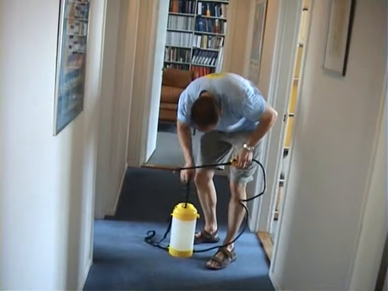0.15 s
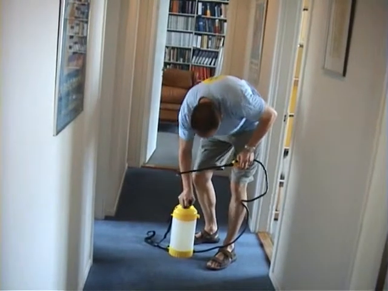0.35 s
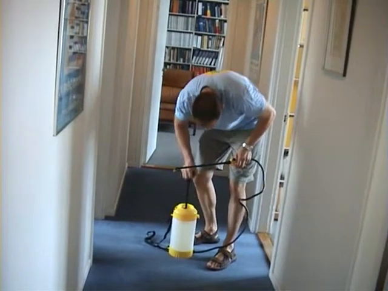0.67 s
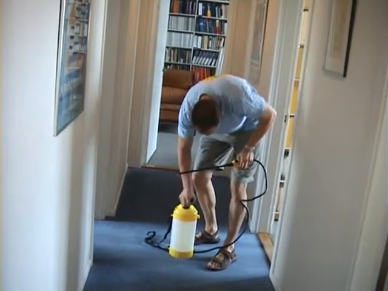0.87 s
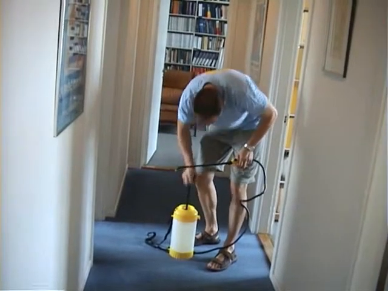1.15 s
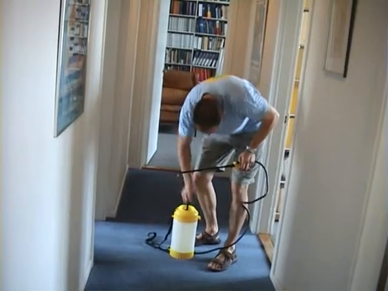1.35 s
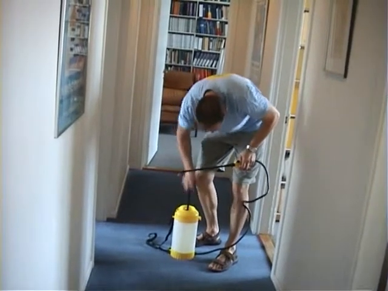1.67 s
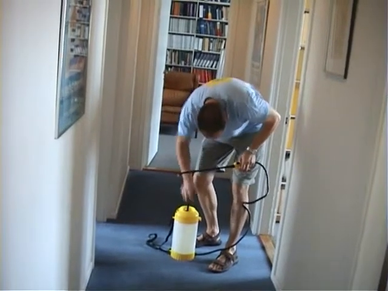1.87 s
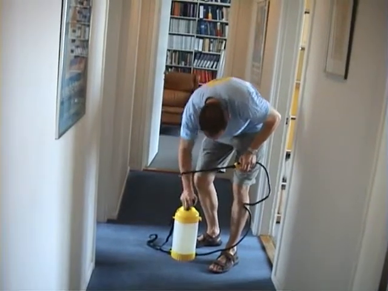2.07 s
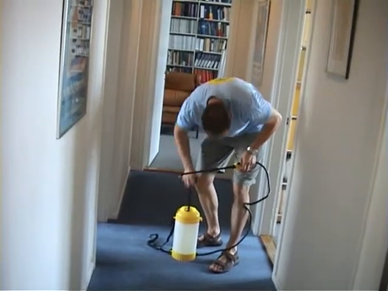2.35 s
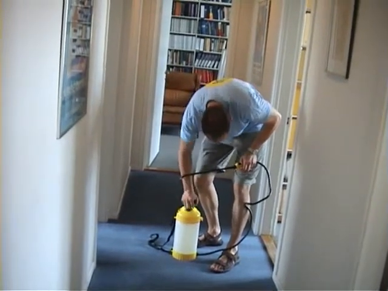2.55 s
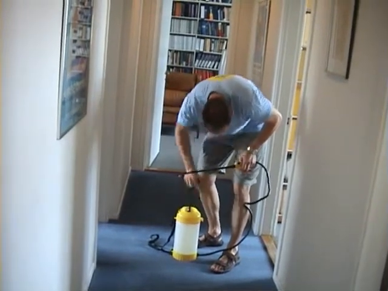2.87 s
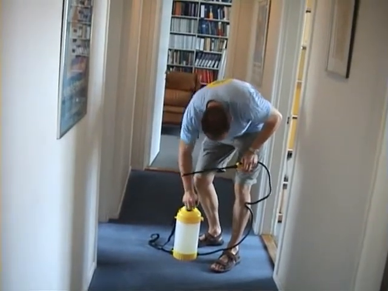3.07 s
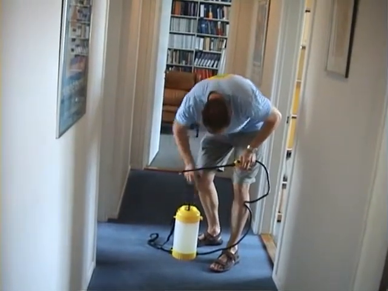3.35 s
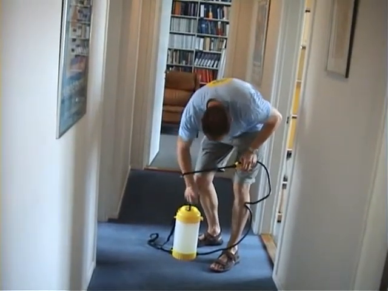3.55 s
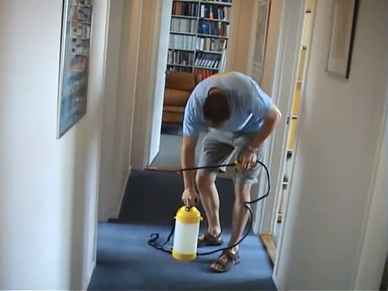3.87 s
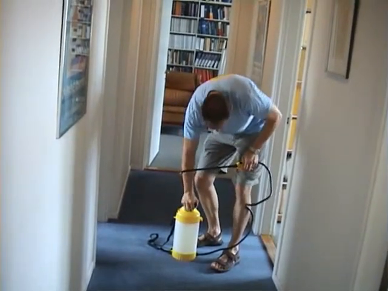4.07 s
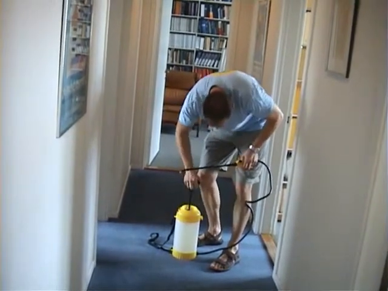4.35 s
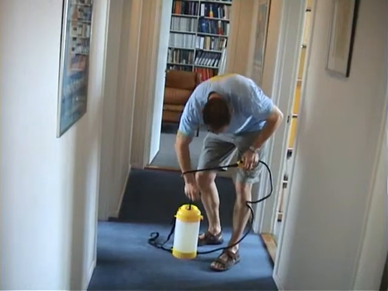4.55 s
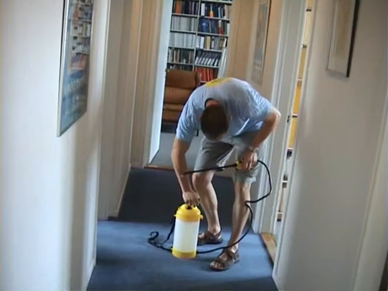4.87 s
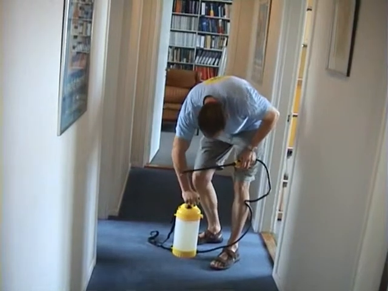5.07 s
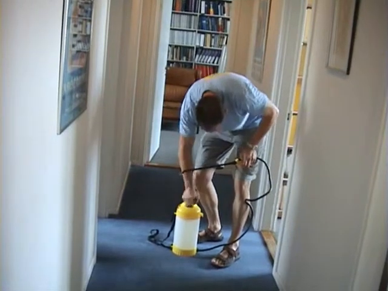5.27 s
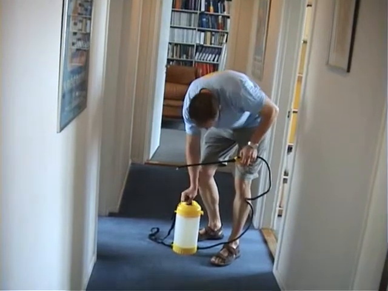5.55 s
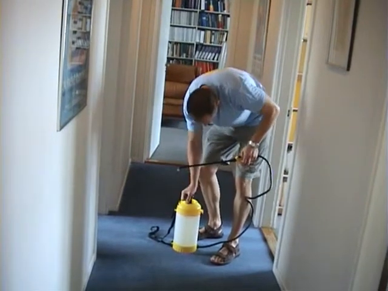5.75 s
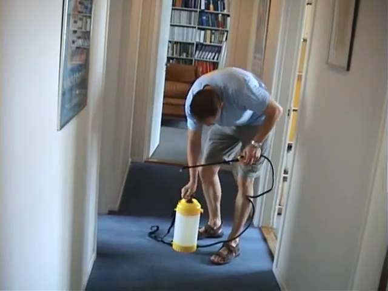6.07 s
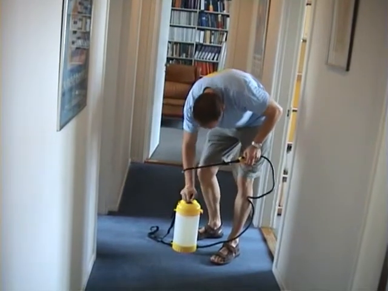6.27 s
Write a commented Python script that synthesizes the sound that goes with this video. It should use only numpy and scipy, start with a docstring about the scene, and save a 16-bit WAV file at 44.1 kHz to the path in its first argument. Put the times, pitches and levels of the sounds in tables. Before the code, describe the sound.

A plastic garden sprayer is pumped by hand, about two strokes a second. Each lift brings a soft thup and a faint rubbing hiss; each push ends in a dull hollow thud, a short valve squeak and often a plastic knock. The strokes slow, with one louder squeak, then the handle is knocked home, faintly twisted and tugged with a clack. The sound is in stereo, in a quiet carpeted hallway with a short echo.

```python
"""Pumping a garden sprayer

A plastic sprayer is pumped by hand on the carpet of a quiet, narrow hallway. Friction makes the piston
hiss, the seal flips with a soft thup, and the check valve squeaks as air enters the tank. Impacts on the
stops excite the tank's modes. Last, the handle is pushed home, twisted, and tugged to lift the tank."""
import sys
import numpy as np
from scipy import signal
from scipy.fft import rfft, irfft, next_fast_len
from scipy.io import wavfile

SR = 44100
rng = np.random.default_rng(int(sys.argv[2]) if len(sys.argv) > 2 else 0)


def transcribe(u):
    """Save the signal u as a 16-bit wav file named by the first command-line argument.

    u: samples, shape (n,) or (channels, n), limited to [-1, 1]; the rate is SR.
    q: integer samples, one column per channel.
    """
    v = np.clip(np.atleast_2d(u).T, -1, 1)
    q = np.round(v * 32767).astype(np.int16)
    wavfile.write(sys.argv[1], SR, q)


N = 283116
T = np.arange(N) / SR
RING = T[:11025]  # time axis of one impact
TOP_HZ = 16200


def undb(db):
    """Decibels to amplitude ratio."""
    return np.exp(np.asarray(db) * (np.log(10) / 20))


def unit(x):
    """Normalisation to rms 1."""
    return x / np.sqrt(np.mean(x ** 2))


def at(points, hz):
    """Interpolation on a log-frequency axis."""
    frequency, value = np.transpose(points)
    return np.interp(np.log(np.maximum(hz, 1)), np.log(frequency), value)


def colour(x, points):
    """Zero-phase filtering by points of frequency_hz, gain_db."""
    size = next_fast_len(x.shape[-1], True)
    gain = undb(at(points, np.fft.rfftfreq(size, 1 / SR)))
    return irfft(rfft(x, size) * gain, size)[..., :x.shape[-1]]


def noise(points, size):
    """Spectrally shaped noise of rms 1."""
    return unit(colour(rng.standard_normal(size), points))


def fade(t, t60):
    """Exponential damping: 60 dB in t60 seconds."""
    return np.exp(-np.log(1000) * t / t60)


def swell(rise_s):
    """Smooth onset as contact force builds."""
    return 1 - np.exp(-(RING / max(rise_s, 1e-4)) ** 2)


def walk(rate_hz, size):
    """Slow random modulation with a spread near 1."""
    levels = rng.standard_normal(size // 10) * np.sqrt(3 / 2)
    return np.interp(T[:size] * rate_hz, np.arange(len(levels)), levels)


def add(out, start_s, x):
    """Superposition of x from start_s on."""
    i = max(int(start_s * SR), 0)
    out[i:i + len(x)] += x[:max(N - i, 0)]


def ring(modes, detune, scatter_db):
    """Free vibration of damped modes; grip and contact point shift them a little at every blow."""
    hz, db, t60 = np.transpose(modes)[:, :, None]
    shift, scatter = rng.standard_normal((2, len(modes), 1))
    phase = np.float32(2 * np.pi * hz * (1 + detune * shift)) * np.float32(RING)
    sign = (-1) ** np.arange(len(modes))[:, None]  # neighbouring modes swing opposite ways
    return np.sum(sign * undb(db + scatter_db * scatter) * np.sin(phase) * fade(RING, t60), axis=0)


def puff(hz, width_s, centre_s):
    """A Gaussian pressure pulse of one or two cycles."""
    t = RING - centre_s
    return -np.cos(2 * np.pi * hz * t) * np.exp(-(t / width_s) ** 2)


# Modes of the tank's air and walls: frequency_hz, level_db, t60_s
TANK_MODES = [(268, -3.5, 0.11), (326, 0, 0.135), (410, 4.5, 0.1), (465.3, -3, 0.0245)]
# Stiffer modes of shell and barrel: frequency_hz, level_db, t60_s
SHELL_MODES = [(546.3, 0, 0.186), (624.75, -10, 0.237), (722, -1.5, 0.169), (797.8, -7, 0.0602),
               (929, -6, 0.133), (1118.9, 7, 0.048), (1170.6, -3, 0.144), (1498.6, -6, 0.1394),
               (1702.2, -18, 0.03), (2099, -10, 0.0233), (2235.5, -5, 0.0233)]
# Spectrum of plastic on plastic: frequency_hz, level_db
CLACK_SPECTRUM = [(70, -26), (300, -7), (600, 0), (1150, -1), (1500, -4.5), (2300, -4), (2900, -18),
                  (5000, -29)]
# Spectrum of the crack at the contact: frequency_hz, level_db
CRACK_SPECTRUM = [(1500, -20), (2800, 2.5), (4200, 5), (5500, -1.5), (7000, 0), (10000, -0.5), (12000, -2),
                  (16000, -15)]
def blow(contact_ms, flex_db=0):
    """Impact excitation dents the tank and rings its modes; a longer contact removes treble."""
    tank = undb(-2.5) * ring(TANK_MODES, detune=0.018, scatter_db=1) * swell(0.006)
    dent = undb(-5) * puff(hz=258, width_s=0.0029, centre_s=0.0065)
    shell = undb(-9) * ring(SHELL_MODES, detune=0.01058, scatter_db=2.5)
    clack = undb(3.2) * noise(CLACK_SPECTRUM, len(RING)) * fade(RING, 0.095)
    crack = undb(3.8) * noise(CRACK_SPECTRUM, len(RING)) * fade(RING, 0.035)
    impact = undb(flex_db) * (dent + tank) + (shell + clack + crack) * swell(0.0024)
    pole = np.exp(-1000 / (SR * contact_ms))
    return signal.lfilter([1 - pole], [1, -pole], impact)


def floorboards():
    """Structure-borne sound: the floor under the carpet answers late and low."""
    rumble = noise([(20, -6), (38, -8), (85, -1.5), (130, 1), (220, -28)], len(RING))
    return rumble * swell(0.01) * fade(RING, 0.435)


# Blows of the plunger on its seat: time_s, level_db, contact_ms
SEAT_KNOCKS = [(0.001, -17, 0.55), (0.497, -16, 0.12), (1.046, -26, 0.2), (1.595, -13, 0.12),
               (2.107, -14, 0.04), (2.12, -9, 0.2), (2.691, -28, 0.4), (3.205, -16, 0.17),
               (3.298, -29, 0.35), (4.162, -18.5, 0.28), (4.199, -21.5, 0.08), (5.015, -22.5, 0.2),
               (5.431, -14, 0.3), (5.451, -15, 0.08), (6.33, -36.5, 0.45)]
def knocks(lead_s=0.001):
    """A downward impact passes momentum through the tank to the floor."""
    out = np.zeros(N)
    for time_s, db, contact_ms in SEAT_KNOCKS:
        add(out, time_s - lead_s, undb(db) * (blow(contact_ms) + undb(-21.5) * floorboards()))
    return out


# Pump cycles: seal_flip_s, thup_db, top_turn_s, slide_db
PUMP_STROKES = [(0.074, -23.5, 0.275, -38.5), (0.619, -27, 0.83, -38), (1.2047, -21, 1.385, -40),
                (1.725, -23, 1.94, -39), (2.238, -26, 2.44, -40), (2.863, -19, 3.02, -42),
                (3.377, -23, 3.555, -41), (4.35, -22.5, 4.58, -44)]
# Turns of the handle in the cap: start_s, length_s, level_db
HANDLE_TWISTS = [(5.77, 0.24, -51), (6.12, 0.12, -57), (6.25, 0.15, -49)]
def slides(pull_lead_s=0.035, lift_skew=1.25, push_s=0.265, push_skew=0.88):
    """Sliding motion as start_s, length_s, level_db, skew; speed peaks late for a skew above 1."""
    moves = []
    for flip_s, _, turn_s, db in PUMP_STROKES:
        start_s = flip_s - pull_lead_s
        moves.append((start_s, turn_s - start_s, db, lift_skew))
        moves.append((turn_s, push_s, db + 0.5, push_skew))
    return moves + [(start_s, length_s, db, 1) for start_s, length_s, db in HANDLE_TWISTS]


# Spectrum of the seal rubbing on the barrel: frequency_hz, level_db
RUB_SPECTRUM = [(120, -11.5), (200, -21.5), (263, -3), (360, -11), (424, 3.5), (491, -5.5), (590, -5.5),
                (899, -15), (1140, -11), (1590, -7.5), (1810, -15), (2250, -6.5), (3020, -16.5),
                (6640, -17.5), (16000, -36)]
def piston(grit_db=2.0, rub_power=0.65):
    """Sliding friction rubs and creaks; flow noise grows faster, with the square of the speed."""
    friction, flow = np.zeros((2, N))
    for start_s, length_s, db, skew in slides():
        speed = np.abs(np.sin(np.pi * (T[T < length_s] / length_s) ** skew))
        add(friction, start_s, undb(db) * speed ** rub_power)
        add(flow, start_s, undb(db) * speed ** 2)
    grit = rng.standard_normal(N) * undb(grit_db * walk(350, N))
    rub = unit(colour(grit, RUB_SPECTRUM)) * undb(2.4 * walk(25, N))
    # about 220 catches of the seal per second ring the barrel
    catches = rng.standard_normal(N) * (rng.random(N) < 220 / SR)
    barrel = noise([(500, -11), (1100, 6.5), (2200, 5), (3000, 1.5), (6000, -23)], len(RING))
    creak = unit(signal.oaconvolve(catches, barrel * fade(RING, 0.052))[:N])
    air = noise([(2000, -12), (3500, 2.5), (6500, -4.5), (9000, -5.5), (11000, -13.5), (16000, -15)], N)
    return (undb(-4.5) * rub + undb(-9) * creak) * friction + undb(-11.3) * air * flow


def thups(lead_s=0.01):
    """Pressure release: early in each lift the seal scuffs, lets go, and the barrel gulps air."""
    out = np.zeros(N)
    for flip_s, db, _, _ in PUMP_STROKES:
        scuff = undb(-15) * noise(CLACK_SPECTRUM, len(RING)) * swell(0.00367) * fade(RING, 0.175)
        gulp = puff(hz=215, width_s=0.00345, centre_s=lead_s)
        add(out, flip_s - lead_s, undb(db) * (gulp + scuff))
    return out


# Touches of the loose rod in its guide: start_s, level_db
ROD_TICKS = [(0.301, -37), (0.842, -41), (1.017, -39), (1.396, -42), (3.691, -35), (3.925, -43),
             (4.058, -46), (5.412, -33), (5.889, -42), (6.063, -39)]
def ticks():
    """Light impacts excite only the shell modes and contact noise."""
    out = np.zeros(N)
    for start_s, db in ROD_TICKS:
        shell = undb(-9) * ring(SHELL_MODES, detune=0.01, scatter_db=2.5)
        clack = undb(3) * noise(CLACK_SPECTRUM, len(RING)) * fade(RING, 0.075)
        crack = undb(-9) * noise(CRACK_SPECTRUM, len(RING)) * fade(RING, 0.04)
        add(out, start_s, undb(db) * (shell + clack + crack) * swell(0.002))
    return out


# The piston meets its air cushion: start_s, level_db
CUSHION_SHOVES = [(0.405, -20), (0.941, -17), (1.505, -17), (2.052, -15), (2.607, -15.5), (3.147, -17.5),
                  (3.707, -16.5), (4.098, -27), (4.907, -24)]
def shoves():
    """Trapped air acts as a spring and stops the piston softly; the tank flexes with a dull thud."""
    out = np.zeros(N)
    for start_s, db in CUSHION_SHOVES:
        dent = undb(-6.5) * puff(hz=289.2, width_s=0.00382, centre_s=0.005182)
        tank = undb(-2.5) * ring(TANK_MODES, detune=0.02, scatter_db=1.5) * swell(0.00716)
        scuff = undb(-8.5) * noise(CLACK_SPECTRUM, len(RING)) * swell(0.0029) * fade(RING, 0.114)
        add(out, start_s, undb(db) * (dent + tank + scuff + undb(-23) * floorboards()))
    return out


# Openings of the check valve: start_s, length_s, level_db, first_pitch_hz, settled_pitch_hz
VALVE_SQUEAKS = [(0.408, 0.09, -22.5, 1020, 824), (0.946, 0.06, -24.5, 792, 751),
                 (1.511, 0.105, -23, 813, 807), (2.056, 0.092, -22, 919, 829),
                 (2.607, 0.15, -19.5, 959, 840), (3.721, 0.032, -14.3, 804, 777),
                 (3.774, 0.02, -21.5, 775, 798), (4.096, 0.15, -20, 1142, 971),
                 (4.907, 0.0915, -9, 1186, 854), (5.432, 0.051, -13, 1163, 1092)]
# Overtone envelope of the slapping lip: frequency_hz, level_db
SLAP_SPECTRUM = [(1600, -8), (2250, -2), (2600, -20), (2900, -28), (4400, -29), (6600, -31), (8500, -38),
                 (16000, -44)]
def squeaks(glide_s=0.032, sag_t60_s=0.429, release_s=0.0108, rasp=0.188):
    """Flow-induced oscillation of the valve lip; pitch and strength sag as the pressures equalise."""
    out, t = np.zeros(N), T[:5000]
    harmonic = np.arange(2, 20)[:, None]
    for start_s, length_s, db, first_hz, settled_hz in VALVE_SQUEAKS:
        # a louder or higher squeak swells sooner and slaps harder
        drive_db = db + 20
        rise_s = min(12 / first_hz * undb(-0.3 * drive_db), 0.4 * length_s)
        slap_db = -11 + 22 * np.log2(first_hz / 1000) + 0.6 * drive_db
        waver = 1 + 0.016 * walk(400, len(t))
        hz = (settled_hz + (first_hz - settled_hz) * np.exp(-t / glide_s)) * waver
        phase = 2 * np.pi * np.cumsum(hz) / SR
        gains = undb(at(SLAP_SPECTRUM, harmonic * hz)) * (harmonic * hz < TOP_HZ)
        overtones = gains * np.sin(harmonic * phase + 2 * np.pi * rng.random(harmonic.shape))
        slap = overtones.sum(axis=0) * (1 + rasp * walk(642, len(t)))
        pop = (t / rise_s * np.exp(1 - t / rise_s)) ** 3.38
        flutter = undb(2.5 * walk(150, len(t)))
        flow = 0.313 * (1 - np.exp(-t / rise_s)) * fade(t, sag_t60_s) * flutter
        swing = pop + flow * np.clip((length_s - t) / release_s, 0, 1)
        # the wider the lip swings, the harder it slaps its seat
        tone = np.sin(phase) + undb(slap_db) * swing ** 0.5 * slap
        air = undb(-17.5) * noise(CLACK_SPECTRUM, len(t))
        add(out, start_s, undb(db) * swing * (tone + air))
    return out


# Tugs on the top stop, the last of which lifts the tank: time_s, level_db
HANDLE_TUGS = [(1.906, -20), (2.452, -20), (3.544, -19), (5.954, -12.5)]
def tugs(lead_s=0.001):
    """An upward impact on the cap flexes the tank more than a push and does not drive the floor."""
    out = np.zeros(N)
    for time_s, db in HANDLE_TUGS:
        add(out, time_s - lead_s, undb(db) * blow(contact_ms=0.11, flex_db=5.5))
    return out


# Air escaping at the hardest blow: start_s, level_db, t60_s
SEAL_SPITS = [(2.108, -18, 0.15)]
def spits():
    """Air forced past the seal gives a decaying burst of jet noise."""
    out = np.zeros(N)
    for start_s, db, t60 in SEAL_SPITS:
        jet = noise([(2800, -27), (3900, 8.5), (5700, 5.5), (6800, -15), (12000, -29.5)], len(RING))
        add(out, start_s, undb(db) * jet * fade(RING, t60))
    return out


def diffuse(size, apart_hz=700):
    """A diffuse noise field at two close points: coherent in the bass, unrelated in the treble."""
    fast = next_fast_len(size, True)
    mid, side = rfft(rng.standard_normal((2, fast)))
    side_share = 0.5 / (1 + apart_hz / np.linspace(1, SR / 2, len(mid)))
    pair = mid * np.sqrt(1 - side_share) + np.array([[1], [-1]]) * side * np.sqrt(side_share)
    return irfft(pair, fast)[:, :size]


# Reverberation time: frequency_hz, t60_s
TAIL_DECAY = [(60, 1.5), (150, 0.0257), (400, 0.5), (1000, 0.3514), (2500, 0.48), (7000, 0.2166),
              (15000, 0.0037)]
# Spectrum of the reverberant tail: frequency_hz, level_db
TAIL_SPECTRUM = [(40, -13.5), (150, -4.5), (400, -0.5), (1000, -0.5), (2500, -8.5), (7000, 2.5),
                 (15000, -1.5)]
# Reflections from two near surfaces: left_delay_s, right_delay_s, level_db
REFLECTIONS = [(.0034, .0039, -16), (0.0098, 0.014, -13)]
# Level of the left channel over the right: frequency_hz, level_db
LEFT_LEVEL = [(100, -1.2), (380, 0), (700, 2.5), (1290, 2), (2300, 6.5), (4400, 2.5), (8000, 1),
              (15000, 2.5)]
# Phase lead of the left channel over the right: frequency_hz, phase_rad
LEFT_PHASE = [(0, 0), (860, 0.573), (1640, 1), (2240, -1.31), (3960, -0.63), (4480, -0.92), (6460, -0.4),
              (8350, -0.49), (9820, -0.36), (11700, -0.79), (12600, 0.44), (14000, 0.52), (14300, -0.56),
              (16100, 0.0)]
def hallway(x, tail_db=-7, build_s=0.00267, early_db=-3, early_t60_s=0.147):
    """Convolution with a room response: direct sound, near reflections, early scatter, short tail."""
    t = T[:18000]
    centres = np.geomspace(60, 15000, 9)
    spectrum, tail = rfft(diffuse(len(t))), 0
    for hz, band in zip(centres, np.eye(len(centres))):
        weight = at(np.column_stack([centres, band]), np.fft.rfftfreq(len(t), 1 / SR))
        band_noise = irfft(spectrum * weight, len(t))
        tail = tail + band_noise * fade(t, at(TAIL_DECAY, hz)) * undb(at(TAIL_SPECTRUM, hz))
    tail *= 1 - np.exp(-t / build_s)
    early = colour(diffuse(len(t)), [(150, -20.5), (700, -17.5), (3000, -8)]) * fade(t, early_t60_s)
    response = (undb(tail_db) * tail + undb(early_db) * early) / np.sqrt(SR / 60)
    response[:, 0] += 1  # direct sound
    for left_s, right_s, db in REFLECTIONS:
        response[[0, 1], [int(left_s * SR), int(right_s * SR)]] += undb(db)
    size = next_fast_len(N + len(t), True)
    sides, hz = np.array([[0.5], [-0.5]]), np.fft.rfftfreq(size, 1 / SR)
    stereo = undb(sides * at(LEFT_LEVEL, hz)) * np.exp(1j * sides * at(LEFT_PHASE, hz))
    return irfft(rfft(x, size) * rfft(response, size) * stereo, size)[:, :N]


# Spectrum of the still air of the house: frequency_hz, level_db
AMBIENT_SPECTRUM = [(15, -11.5), (25, -1.5), (76, -10.5), (195, -2.5), (531, 0), (988, -7.5), (1130, 1),
                    (1290, -10), (2480, -10.5), (2690, -8.5), (2910, -14), (6210, -17.5), (7920, -23),
                    (11300, -23), (16000, -28.5)]
def room_tone():
    """Diffuse ambient noise with one faint tone of steady pitch; both waver in level."""
    air = unit(colour(diffuse(N), AMBIENT_SPECTRUM)) * undb(-52 + walk(5, N))
    tone = undb(-59) * np.sin(2 * np.pi * 571 * T) * undb(2 * walk(3.335, N))
    return air + tone


def scene():
    """Superposition of the sprayer's sources, heard in the hallway over its ambient noise."""
    sprayer = knocks() + tugs() + spits() + ticks() + shoves() + thups() + squeaks() + piston()
    return hallway(sprayer) + room_tone()


# Strength of the faint treble sidebands: source_frequency_hz, gain_db
SIDEBAND_GAIN = [(400, -44), (800, -25), (2250, -18), (4000, -24), (8000, -40)]
def record(dry, carrier_hz=12100):
    """Band limiting and clipping; ring modulation mirrors the sound faintly about a high carrier."""
    bass_cut = signal.butter(4, 26, "high", fs=SR, output="sos")
    treble_cut = signal.ellip(10, 0.2, 70, TOP_HZ, fs=SR, output="sos")
    lean = signal.sosfilt(bass_cut, dry)
    sidebands = colour(lean, SIDEBAND_GAIN) * np.cos(2 * np.pi * carrier_hz * T)
    return signal.sosfilt(treble_cut, np.clip(lean + sidebands, -1, 1))


dry = scene()
out = record(dry)
transcribe(out)
```